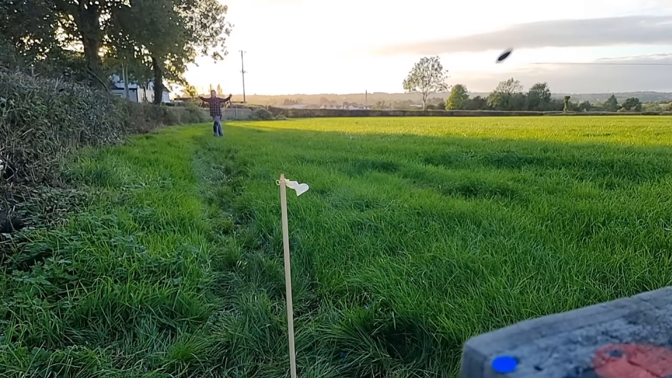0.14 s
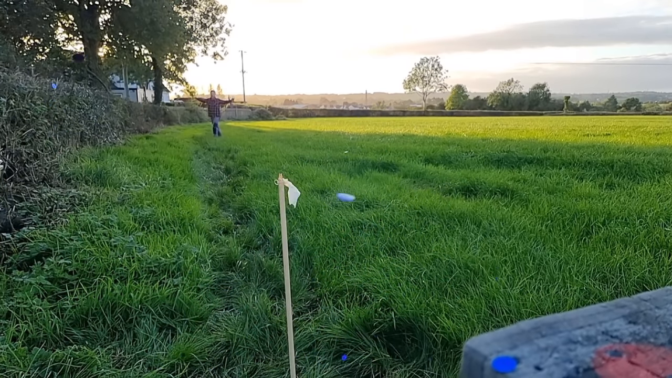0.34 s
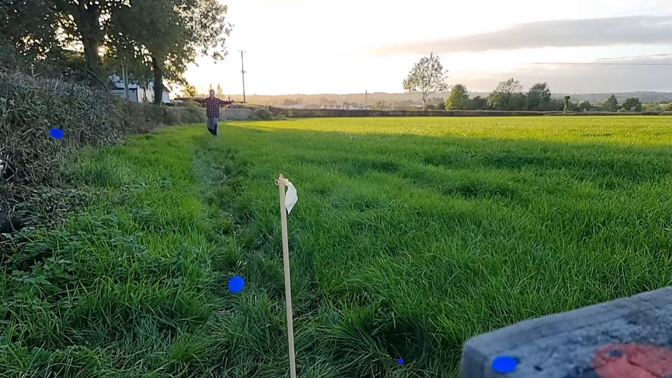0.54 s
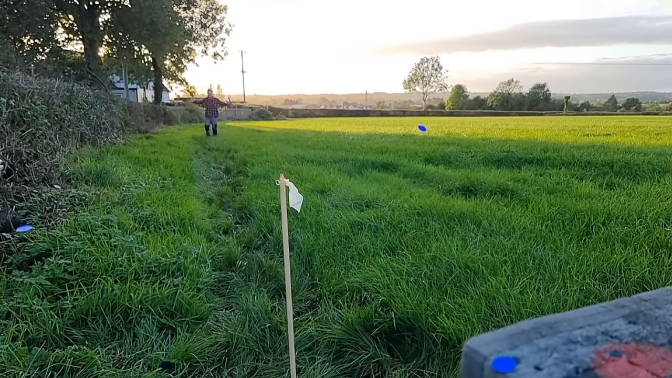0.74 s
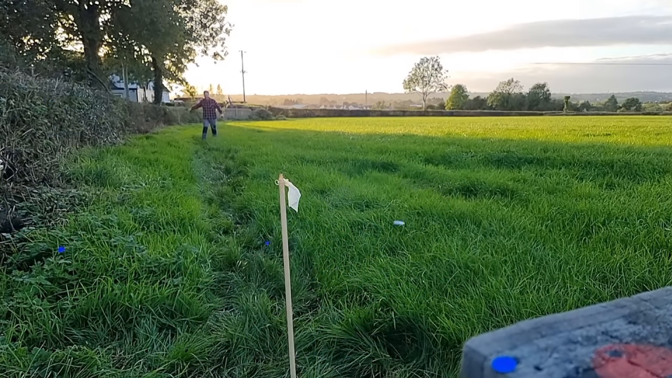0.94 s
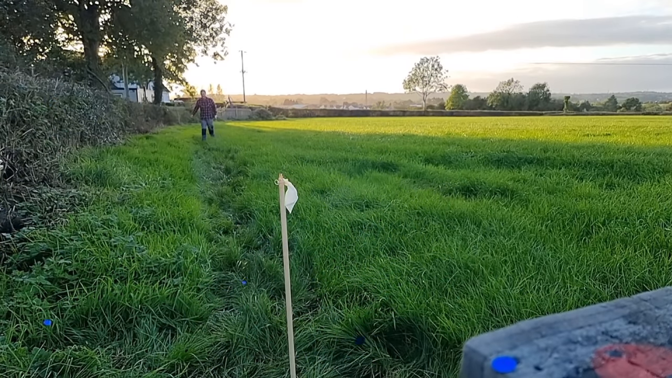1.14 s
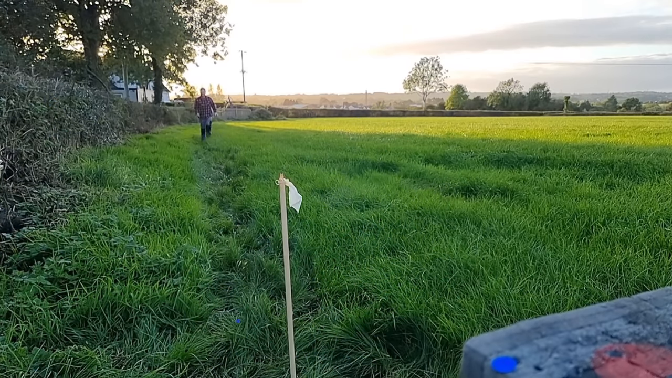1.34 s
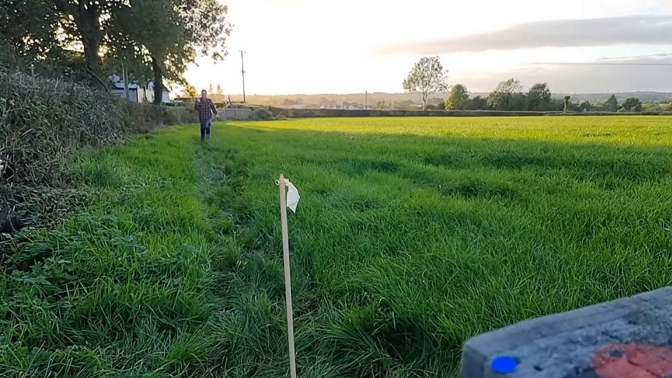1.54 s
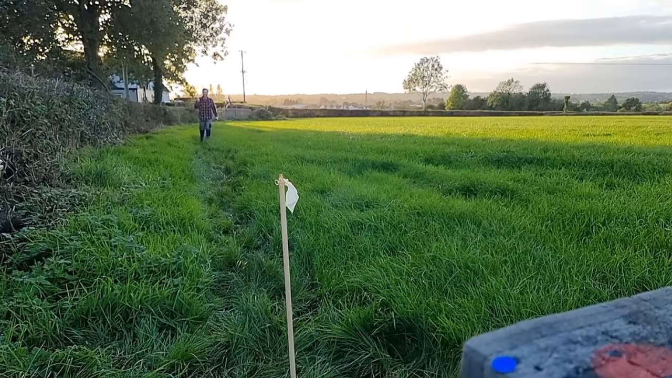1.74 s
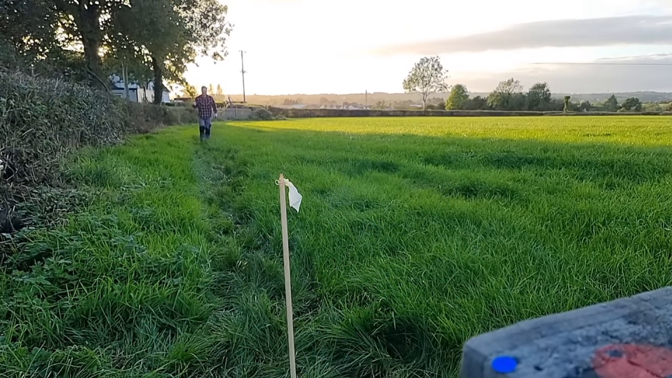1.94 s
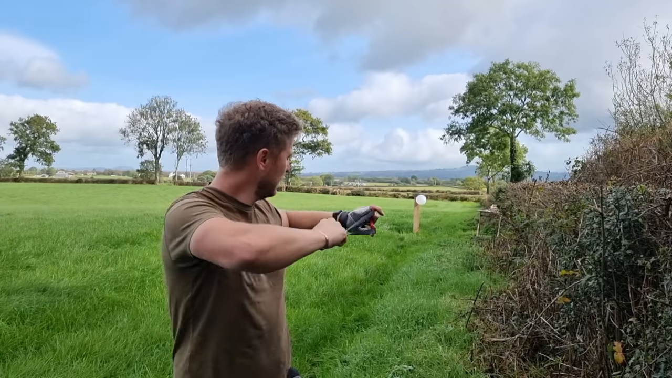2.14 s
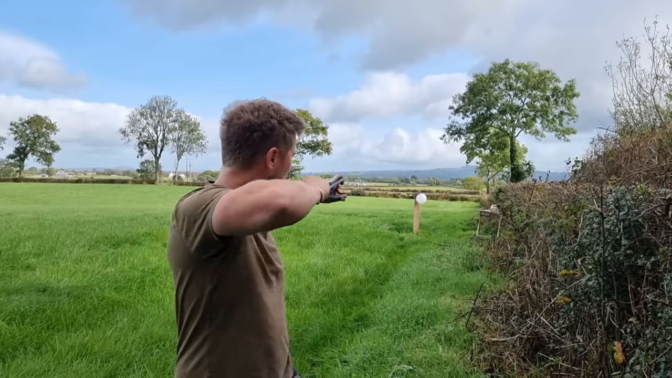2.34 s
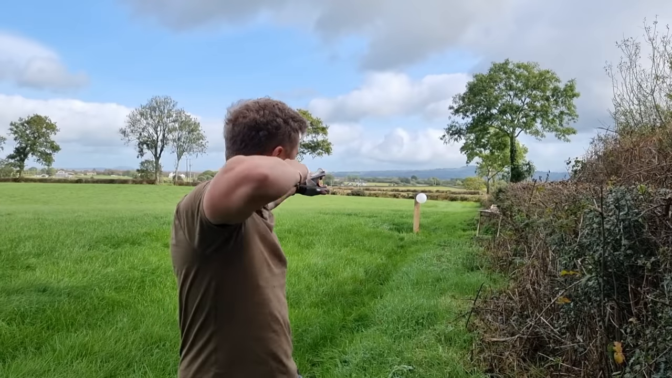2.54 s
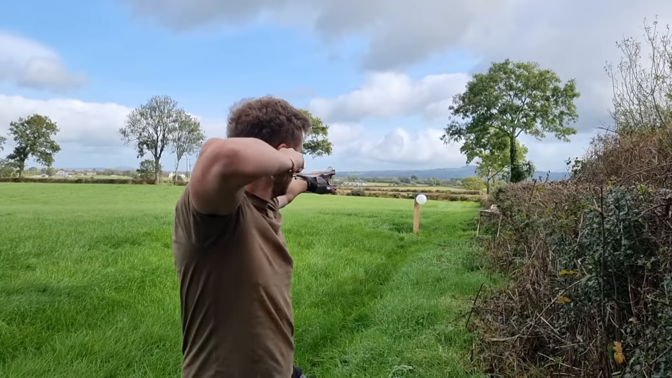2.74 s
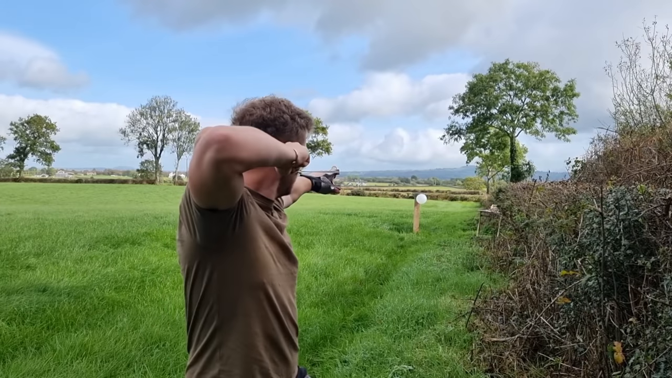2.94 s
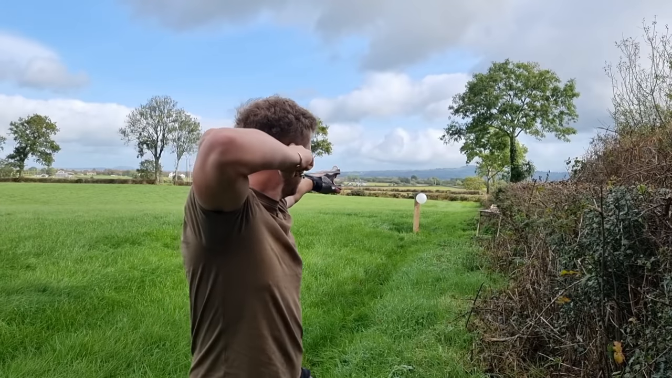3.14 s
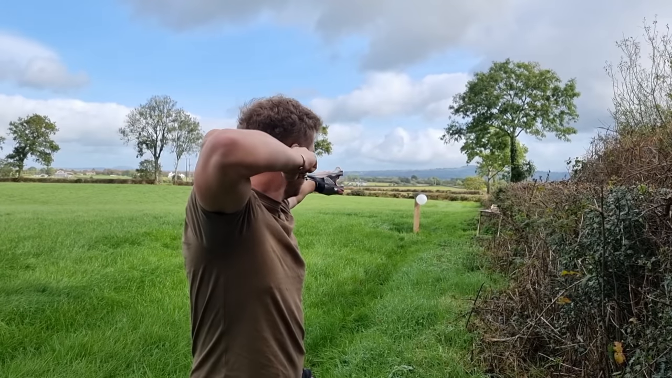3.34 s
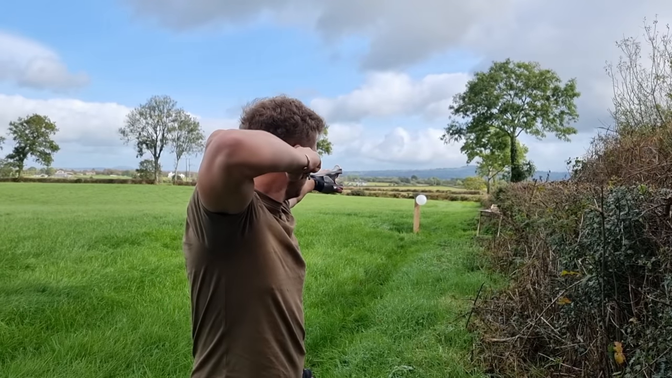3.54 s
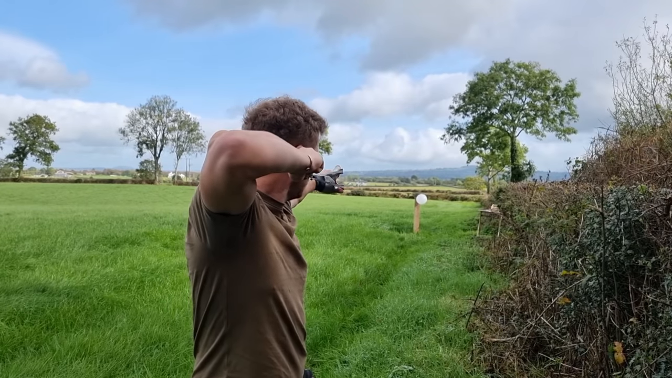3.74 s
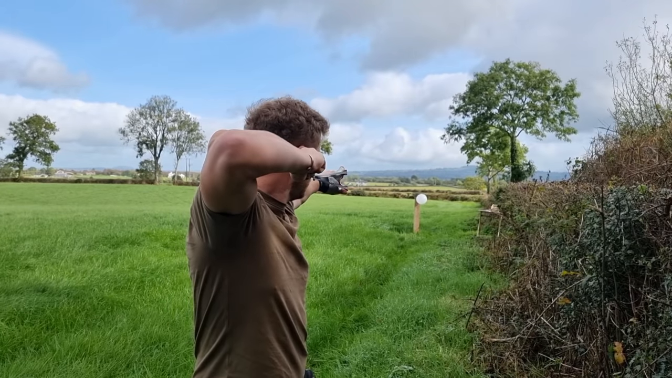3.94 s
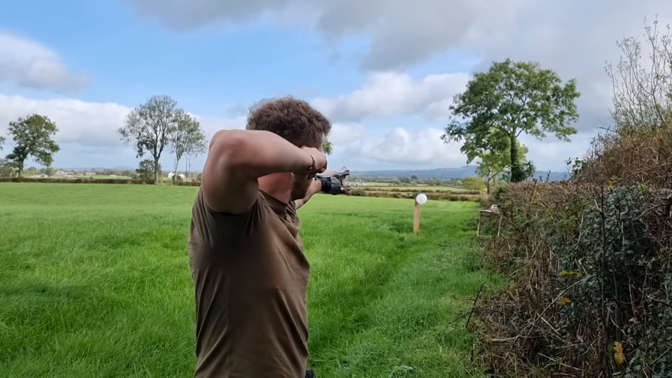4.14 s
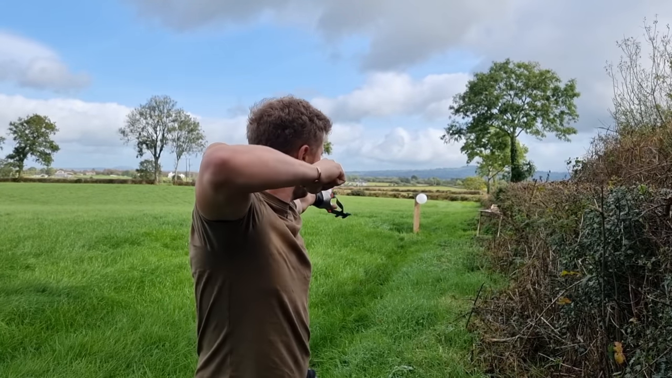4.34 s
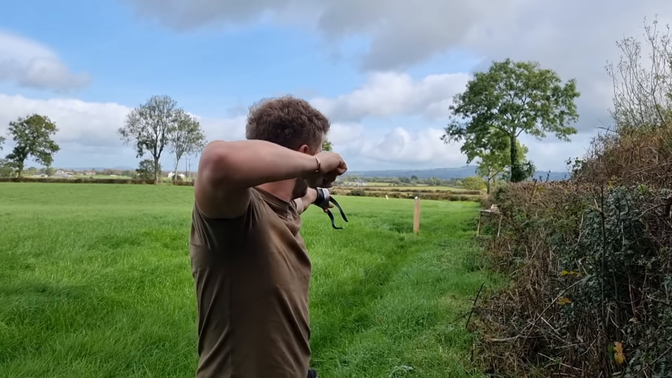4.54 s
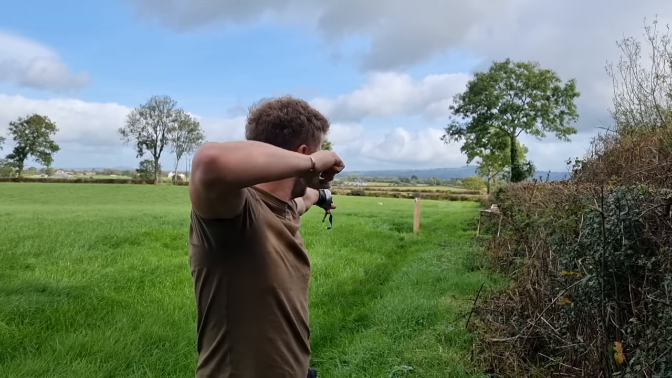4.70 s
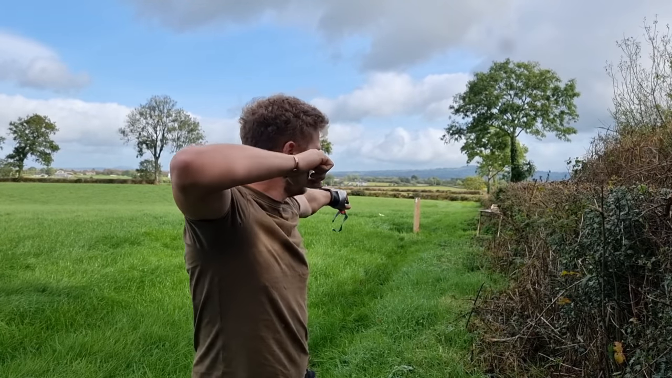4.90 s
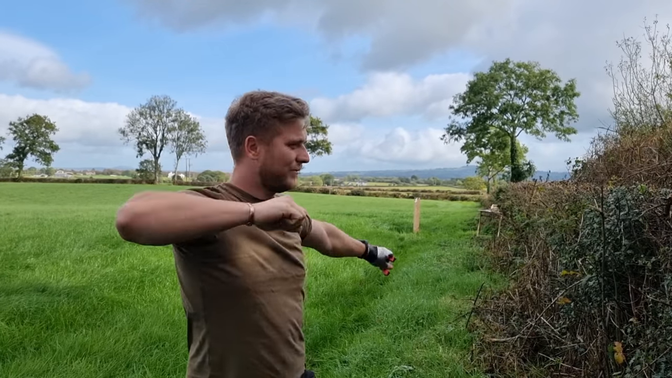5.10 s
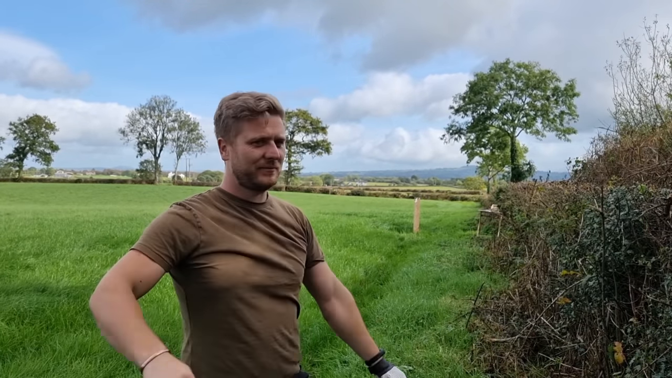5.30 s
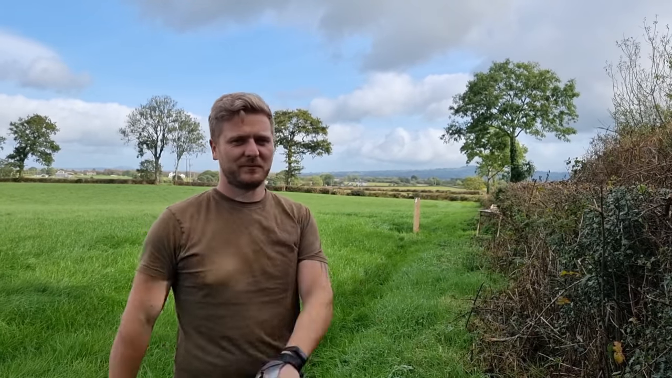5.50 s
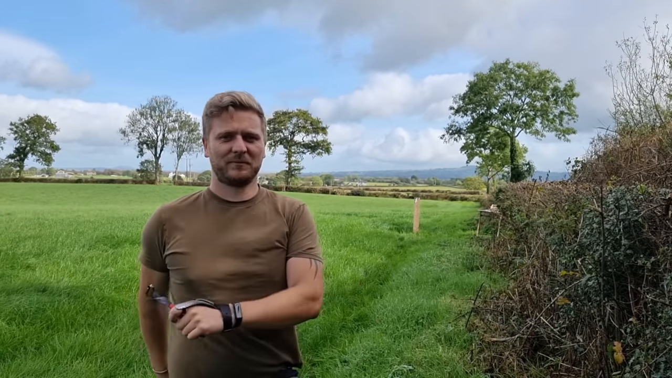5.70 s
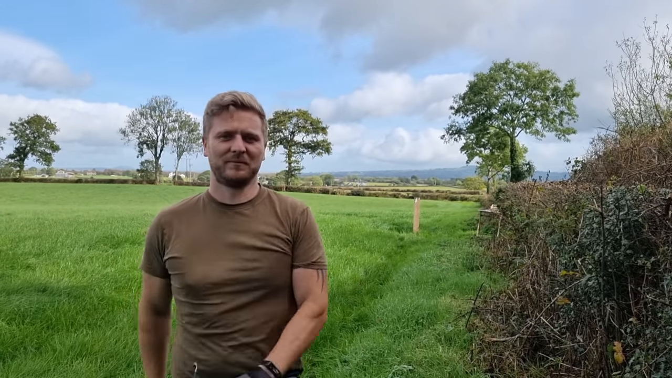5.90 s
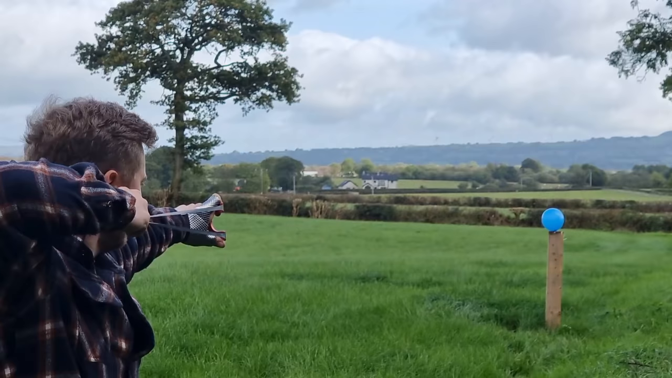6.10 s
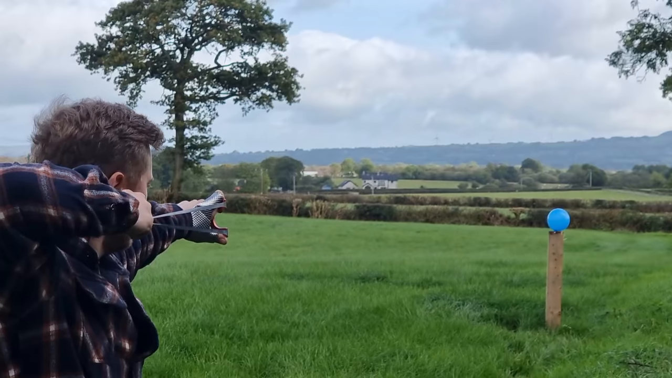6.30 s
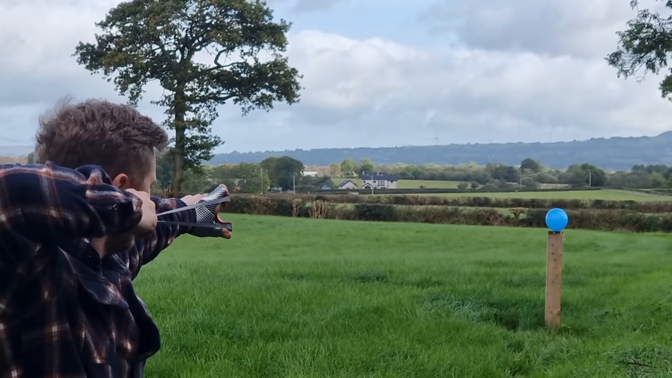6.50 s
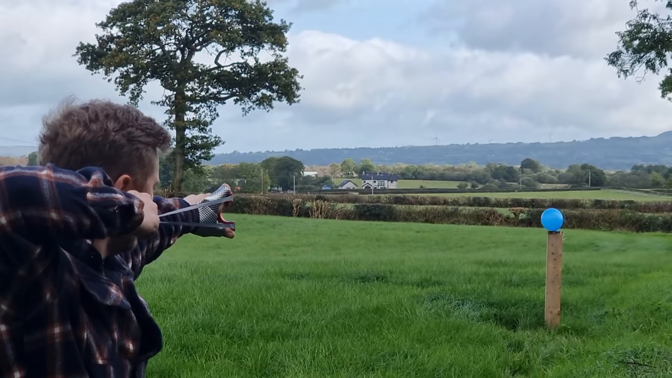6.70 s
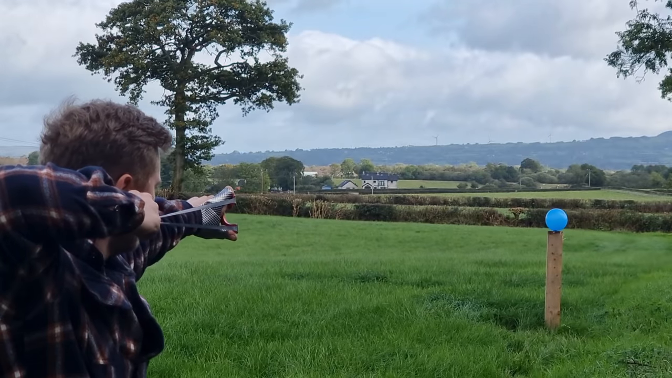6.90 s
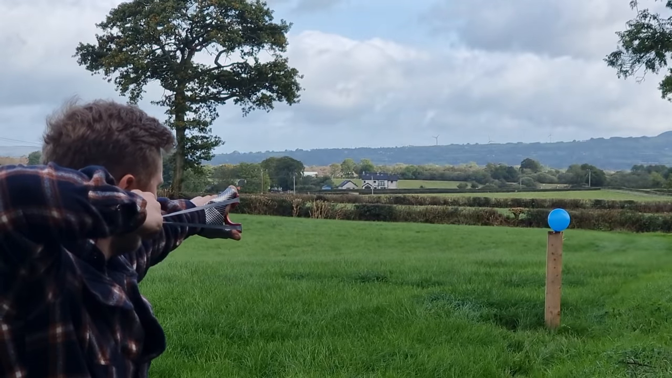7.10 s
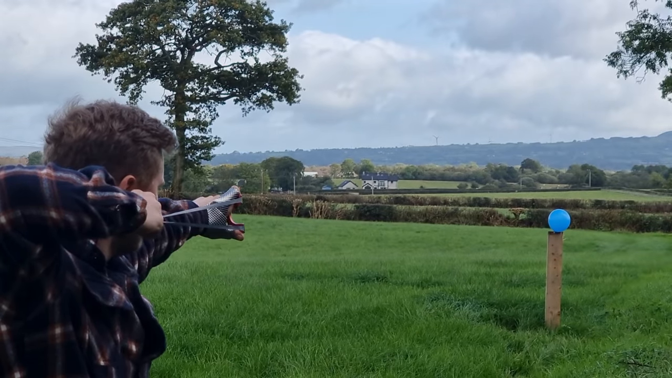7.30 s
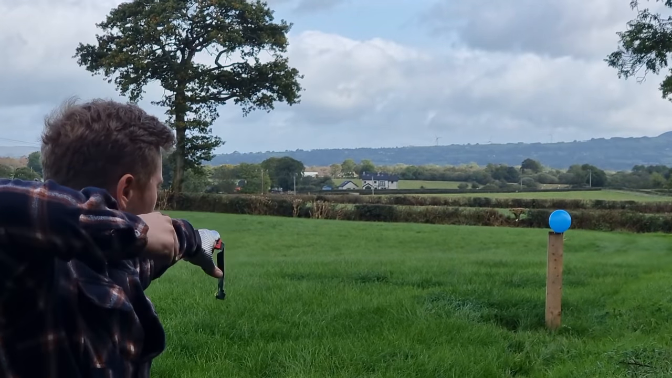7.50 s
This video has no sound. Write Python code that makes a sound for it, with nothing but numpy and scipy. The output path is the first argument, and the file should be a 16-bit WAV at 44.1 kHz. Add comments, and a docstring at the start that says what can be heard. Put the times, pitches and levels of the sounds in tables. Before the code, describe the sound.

An open field starts quiet, with a far country hum, light wind, faint rustling grass and distant bird calls. At about 2.4 seconds the background grows a little fuller, and a small bird close by gives a thin buzz and a quick run of high notes until 3.1. Low gusts rumble on the microphone on and off from about 3 seconds. At 4.4 a slingshot's rubber bands whip and slap with a soft thump. At 4.6 the dart bursts its target with a sharp crack, the loudest sound, echoing briefly off hedge and trees. Pieces rattle, and a few land softly until 5.2, followed by a dull bump. Faint traffic passes far off between about 4 and 6 seconds. Around 6.7 to 7.1 a bird gives three faint double ticks amid more gusts. At 7.5 the slingshot snaps again, slightly louder and brighter.

```python
"""Slingshot practice in an open field, with the stereo microphone set down at three spots in turn.
On each of two shots the rubber bands whip forward and slap twice over; the first dart bursts its
target with a loud crack that scatters off the hedge. Wind rumbles on the microphone and grass rustles.
Small birds sing close by and across the field, over a far country hum and passing traffic."""
import sys
import numpy as np
from scipy import signal
from scipy.fft import rfft, irfft, next_fast_len
from scipy.io import wavfile

SR = 44100
rng = np.random.default_rng(int(sys.argv[2]) if len(sys.argv) > 2 else 0)


def store_wav(level_fs):
    """Save 16-bit WAV to argv[1]."""
    pcm = np.round(np.clip(np.atleast_2d(level_fs), -1, 1) * 32767)
    wavfile.write(sys.argv[1], SR, pcm.T.astype(np.int16))


N = 332938
TIME = np.arange(N) / SR


def from_db(db):
    return 10 ** (np.asarray(db) / 20)


def at_hz(points, hz):
    """Reads a table on a log-frequency axis."""
    knots, values = np.transpose(points)
    return np.interp(np.log(np.maximum(hz, 1)), np.log(knots), values)


def panned(x, pan_db):
    """Places a sound left (positive) or right (negative) of the microphone."""
    return x * from_db([[pan_db / 2], [-pan_db / 2]])


def add(out, start_s, sound):
    """Mixes a sound in at a time."""
    start = max(round(start_s * SR), 0)
    out[:, start:start + sound.shape[-1]] += sound[..., :N - start]


def drift(rate_hz, size=N):
    """A smooth random wander with a spread of about 1."""
    steps = np.arange(size) * rate_hz / SR
    return np.interp(steps, np.arange(4096), rng.standard_normal(4096))


def swell(peak_s, level_db, rise_s, fall_s):
    """A gain that grows to a peak and dies away."""
    return from_db(level_db) * np.exp(-np.maximum((peak_s - TIME) / rise_s, (TIME - peak_s) / fall_s))


def noise(spectrum, likeness, tilt_db=0, size=N):
    """Stereo noise with a mid of rms 1; left-right likeness is a number or rows of freq_hz, likeness."""
    padded = next_fast_len(size, real=True)
    hz = np.fft.rfftfreq(padded, 1 / SR)
    alike = np.clip(at_hz(likeness, hz) if np.ndim(likeness) else likeness, -.7, 1)
    gain = from_db(at_hz(spectrum, hz) + tilt_db * np.log2(1 + hz / 1000))
    mid, side = gain * np.exp(2j * np.pi * rng.random((2, len(hz))))
    width = np.sqrt((1 - alike) / (1 + alike))
    pair = irfft(mid + width * side * [[1], [-1]], padded)[:, :size]
    return pair / np.std(pair.mean(axis=0))


def bursts(rows, spectrum, likeness, size=4096):
    """Short puffs of air that swell to a peak and die away."""
    out, t = np.zeros((2, N)), (np.arange(size) - size // 4) / SR
    for peak_s, level_db, rise_s, decay_s, tilt_db in rows:
        shape = np.exp(np.where(t < 0, t / rise_s, -t / decay_s))
        add(out, peak_s + t[0], from_db(level_db) * shape * noise(spectrum, likeness, tilt_db, size))
    return out


def scatter(x, t60s, likeness, tilt_db=0, size=32768):
    """Countless weak echoes off vegetation; each half octave dies as t60s (freq_hz, t60_s) says."""
    t, hz = np.arange(size) / SR, np.fft.rfftfreq(size, 1 / SR)
    spectrum = rfft(noise([(1, 0), (SR, 0)], likeness, tilt_db, size))
    edges_hz = 60 * 2 ** (np.arange(18) / 2)
    echoes = np.zeros((2, size))
    for low, high in zip(edges_hz, edges_hz[1:]):
        band = irfft(spectrum * ((hz >= low) & (hz < high)))
        echoes += band * 1000 ** (-t / at_hz(t60s, np.sqrt(low * high)))
    return signal.oaconvolve(x, echoes / np.sqrt(np.sum(echoes ** 2) / 2), axes=1)[:, :N]


def present(start_s, end_s, fade_s=.05):
    """A gain that fades in and out with the microphone's stay at one spot."""
    return np.clip(np.minimum(TIME - start_s, end_s - TIME) / fade_s, 0, 1)


# the microphone's stay at each spot: start_s, end_s
MIC_SPOTS = [(0, 2.39), (2.37, 6.27), (6.22, 7.65)]

def at_spots(levels_db, fade_in_db=9, fade_in_s=.8):
    """A background gain that comes up at the start and is then steady at each spot."""
    steady = sum(from_db(level_db) * present(*spot) for spot, level_db in zip(MIC_SPOTS, levels_db))
    return steady * from_db(-fade_in_db * np.exp(-TIME / fade_in_s))


# the distant hum, one spectrum per spot: freq_hz, density_db
HUM_SPECTRA = [
    [(88, -29), (150, 1.5), (223, -2), (246, -8.5), (410, -14), (545, -8), (588, -7.5), (910, -6),
     (1740, -19), (2310, -32), (2540, -34), (14000, -38)],
    [(80, -21), (150, 1.5), (330, 5), (450, -3.5), (750, -1.5), (1000, -3), (1500, -12), (2300, -24),
     (4000, -28.5), (6800, -29.5), (8000, -49.5), (15000, -43)],
    [(88, -28), (150, -7), (193, -10), (229, -6.5), (525, -4.5), (567, -4.5), (1380, -14.5), (1570, -21.5),
     (1870, -21.5), (2970, -31), (4720, -37.5), (6550, -35), (7940, -57), (15000, -43.5)],
]
# its strength at each spot: level_db
HUM_LEVELS = [-63, -60.6, -59.5]
# how alike it reaches the two sides of the microphone: freq_hz, likeness
HUM_STEREO = [(150, .6), (380, .5), (700, -.35), (1100, -.05), (2400, -0.09), (15000, 0.12)]

def country_hum(fade_s=.01):
    """Far traffic and trees, coloured differently at each spot."""
    hum = np.zeros((2, N))
    for (start_s, end_s), spectrum in zip(MIC_SPOTS, HUM_SPECTRA):
        size = int((end_s - start_s) * SR)
        soft_ends = signal.windows.tukey(size, 2 * fade_s / (end_s - start_s))
        add(hum, start_s, noise(spectrum, HUM_STEREO, size=size) * soft_ends)
    return at_spots(HUM_LEVELS) * hum


# light air on the microphone at each spot: level_db
BREEZE_LEVELS = [-61.5, -52, -52]
# gusts on the microphone: peak_s, level_db
MIC_GUSTS = [(1.45, -62.5), (2.95, -43.5), (3.379, -41.5), (3.85, -47), (4.75, -46.5), (5.44, -43),
             (6.62, -44), (6.9, -39.5)]
# eddies at its ports: freq_hz, density_db
EDDY_SPECTRUM = [(11, -40), (18, -16.5), (46, -1), (68, -1), (83, -3), (233, -29), (260, -27), (340, -55.5),
                 (570, -120)]

def wind(gain_db=1, lumpy_db=2.8, buffet_db=-52):
    """Light air moves both microphone ports alike; gusts buffet each on its own."""
    gust_power = sum(swell(s, level_db, rise_s=.17, fall_s=.27) ** 2 for s, level_db in MIC_GUSTS)
    strength = np.sqrt(at_spots(BREEZE_LEVELS) ** 2 + gust_power)
    eddies = noise(EDDY_SPECTRUM, likeness=[(50, .05), (200, .4)])
    shared = eddies.mean(axis=0)
    apart = np.minimum(strength / from_db(buffet_db), 1)
    rumble = shared + apart * (eddies - shared)
    return panned(rumble * strength * from_db(gain_db + lumpy_db * drift(13)), pan_db=2)


def whistle(hz, level_db, octave_db=-40, attack_s=.016, release_s=.016):
    """A bird's near-pure tone with soft ends and a faint octave."""
    t, phase = np.arange(len(hz)) / SR, 2 * np.pi * np.cumsum(hz) / SR
    shape = np.minimum(t / attack_s, 1) * np.minimum((t[-1] - t) / release_s, 1)
    tone = np.sin(phase) + from_db(octave_db) * np.sin(2 * phase)
    return from_db(level_db) * np.sqrt(2) * shape * tone


def warbled(hz, level_db, depth_hz, octave_db=-40, warble_hz=150, flutter_db=4):
    """A whistle that trembles in pitch and level."""
    size = len(hz)
    phase = 2 * np.pi * warble_hz * np.arange(size) / SR + drift(60, size)
    warble = np.sin(phase) + .5 * drift(200, size)
    return whistle(hz + depth_hz * warble, level_db + flutter_db * drift(90, size), octave_db)


# calls from across the field, with one nearer note at 1.662 s: start_s, length_s, first_hz, last_hz, level_db
FIELD_CALLS = [(.64, .18, 2310, 2370, -86), (1.067, .14, 1566, 1663, -71), (1.36, .09, 1480, 1560, -71),
               (1.39, 0.18, 1960, 1700, -72), (1.515, .12, 2176, 2090, -74.5),
               (1.662, .046, 2240, 1870, -67.5), (1.81, 0.062, 2200, 2580, -74),
               (1.995, .15, 1940, 1825, -73), (6.4, 0.029, 2946, 2870, -70),
               (6.736, .048, 2550, 1880, -67.5), (6.747, 0.032, 3400, 2800, -73)]

def far_birds(direct_db=-5, echo_db=-2, rasp_hz_per_s=1100):
    """Faint glides from far off, the longer the hoarser, reaching the microphone largely as echo."""
    calls = np.zeros((2, N))
    for start_s, length_s, first_hz, last_hz, level_db in FIELD_CALLS:
        size = int(length_s * SR)
        call = warbled(np.geomspace(first_hz, last_hz, size), level_db, rasp_hz_per_s * length_s)
        add(calls, start_s, call * signal.windows.tukey(size, .6))
    echoes = scatter(calls, [(2000, .24), (4500, .31)], likeness=.065)
    return from_db(direct_db) * calls + from_db(echo_db) * echoes


# flurries in the grass around the microphone: peak_s, level_db, spread_s
GRASS_FLURRIES = [(1.1, -79, 0.22), (1.487, -71.5, .005), (1.63, -71, .075), (1.8, -75, .025),
                  (2.32, -71, .025), (6.15, -72, .12)]
# their rustle: freq_hz, density_db
GRASS_SPECTRUM = [(1500, -8), (2500, 3), (4500, -3), (6700, 6.5), (8500, -7), (13500, -2), (16000, -4.5)]

def grass(crisp_db=2):
    """Wind rustles the grass in faint, flickering flurries."""
    flurries = sum(swell(s, level_db, spread_s, spread_s) for s, level_db, spread_s in GRASS_FLURRIES)
    return noise(GRASS_SPECTRUM, likeness=.15) * flurries * from_db(crisp_db * drift(73))


# song from the near hedge: start_s, length_s, first_hz, held_hz, last_hz, level_db, pan_db, depth_hz
HEDGE_SONG = [(2.607, .076, 5800, 4420, 4260, -39, -7, 100), (2.695, .058, 5760, 4660, 4590, -37.5, -1, 42),
              (2.828, .072, 5290, 4600, 4870, -44.5, -7, 30),
              (2.848, 0.039, 5600, 5550, 5440, -53.5, 5, 55),
              (2.897, .122, 5400, 2678, 3220, -48.5, -4, 22), (2.982, .056, 3400, 3370, 3670, -56, 5, 90),
              (3.013, 0.054, 3630, 4060, 3960, -51, 0, 20)]
BUZZ_START_S, BUZZ_LENGTH_S, BUZZ_HZ, BUZZ_DB = 2.378, .174, 7660, -48.3

def near_bird(scoop_hz_per_s=210000, port_lag_s=.00017, echo_db=-9):
    """A thin buzz, then notes that scoop onto their pitch and bend away; wider scoops take longer."""
    song, size = np.zeros((2, N)), int(BUZZ_LENGTH_S * SR)
    buzz = warbled(BUZZ_HZ + 200 * drift(980, size), BUZZ_DB, depth_hz=300, octave_db=-11)
    add(song, BUZZ_START_S, panned(buzz * signal.windows.tukey(size, .3), pan_db=5))
    for start_s, length_s, first_hz, held_hz, last_hz, level_db, pan_db, depth_hz in HEDGE_SONG:
        t = np.arange(int(length_s * SR)) / SR
        scoop = (first_hz - held_hz) * np.exp(-t * scoop_hz_per_s / (abs(first_hz - held_hz) + 1))
        bend = (last_hz - held_hz) * (t / length_s) ** 2
        note = warbled(held_hz + scoop + bend, level_db, depth_hz, octave_db=-42, warble_hz=120)
        add(song, start_s, panned(note, pan_db))
    song[0] = np.interp(TIME - port_lag_s, TIME, song[0])  # the singer sits to the right
    echoes = scatter(song, [(2000, .28), (4500, .34), (8000, .23)], likeness=.065)
    return song + from_db(echo_db) * echoes


# vehicles on a far road: loudest_s, spread_s, roar_db, engine tones as (pitch_hz, level_db)
VEHICLES = [(4.2, .5, -66, [(262, -70), (285, -69), (334, -69), (361, -70)]), (5.8, .38, -64, [(172, -69),
            (205, -68), (1163, -78)])]
# tyre roar from across the fields: freq_hz, density_db
TYRE_SPECTRUM = [(300, -22), (550, -3), (850, 0), (1150, -6), (1600, -22), (2600, -42), (5000, -70)]

def traffic(waver_hz=1.3, throb_db=2, engine_db=1.5, drone_spread=1.7):
    """Each vehicle swells and fades in the distance; its engine is heard for longer than its tyres."""
    out, roar = np.zeros((2, N)), noise(TYRE_SPECTRUM, likeness=-.3)
    for loudest_s, spread_s, roar_db, tones in VEHICLES:
        out += roar * from_db(roar_db) * np.exp(-.5 * ((TIME - loudest_s) / spread_s) ** 2)
        nearness = np.exp(-.5 * ((TIME - loudest_s) / (drone_spread * spread_s)) ** 2)
        for pitch_hz, level_db in tones:
            tone = np.sqrt(2) * np.sin(2 * np.pi * np.cumsum(pitch_hz + waver_hz * drift(11)) / SR)
            out += tone * nearness * from_db(engine_db + level_db + throb_db * drift(6))
    return out * present(*MIC_SPOTS[1])  # the road carries only to the second spot


# the bands hit the fork: slap_s, level_db, rebound_s, release_tilt_db (per octave)
BAND_SHOTS = [(4.3600, -24, .0107, 3), (7.5176, -20, .0117, 11)]
# the snap of flat rubber: freq_hz, density_db
RUBBER_SPECTRUM = [(80, 10.5), (250, 3.5), (700, 6), (1300, 5.5), (2400, 3.5), (3500, 2), (5000, -0.5),
                   (7200, -3.5), (8400, -10.5), (11000, -9.5), (15200, -8.5), (16500, -20)]
# the stages of every shot: relative_db, rise_s, decay_s, tilt_db (per octave)
BAND_WHIP = (-4, .0034, .003, 2)
BAND_SLAP = (-.5, .0005, .0012, 2)
BAND_RECOIL = (-7.5, .002, .003, .5)
BAND_SLAP_BACK = (2, .0009, .0011, 3)
BAND_FLUTTER = (-9, .0015, .006, 5)
RELEASE_DB, RELEASE_RISE_S, RELEASE_DECAY_S = -11.5, .0018, .005

def slingshot(flight_s=.0232, whip_lead_s=.0046, flutter_lag_s=.005, ground_db=-6.5):
    """Let go, the rubber whips, slaps the fork, recoils, slaps back and flutters; the ground echoes."""
    puffs = []
    for slap_s, level_db, rebound_s, release_tilt_db in BAND_SHOTS:
        release = (RELEASE_DB, RELEASE_RISE_S, RELEASE_DECAY_S, release_tilt_db)
        stages = [(-flight_s, release), (-whip_lead_s, BAND_WHIP), (0, BAND_SLAP),
                  (rebound_s / 2, BAND_RECOIL), (rebound_s, BAND_SLAP_BACK),
                  (rebound_s + flutter_lag_s, BAND_FLUTTER)]
        for delay_s, (relative_db, *shape) in stages:
            puffs.append((slap_s + delay_s, level_db + relative_db, *shape))
    slaps = bursts(puffs, RUBBER_SPECTRUM, likeness=[(300, 1), (3000, .7), (12000, .072)])
    ground = scatter(slaps, [(300, .046), (3000, .13), (12000, .16)], likeness=.33)
    return slaps + from_db(ground_db) * ground


# soft thumps of air and movement: peak_s, level_db
AIR_THUMPS = [(4.386, -37), (5.2295, -42)]
# their dull colour: freq_hz, density_db
THUMP_SPECTRUM = [(30, -10), (80, 0), (200, -2), (450, -22), (1200, -60)]

def thumps(rise_s=.003, decay_s=.006, top_hz=500):
    """Dull bumps as the bands go slack and as the shooter turns round."""
    puffs = [(peak_s, level_db, rise_s, decay_s, 0) for peak_s, level_db in AIR_THUMPS]
    bumps = bursts(puffs, THUMP_SPECTRUM, likeness=.85)
    return signal.sosfilt(signal.butter(2, top_hz, fs=SR, output="sos"), bumps)


# the dart pierces, then the target bursts: peak_s, level_db, rise_s, decay_s, tilt_db (per octave)
DART_BLOWS = [(4.6033, -14.5, 0.0003, 0.001, -3.5), (4.6049, -8.7, 0.00032, 0.0018, -1.2)]
# the crack: freq_hz, density_db
CRACK_SPECTRUM = [(100, -11), (450, -15.5), (1200, 0), (1900, 2.5), (2700, -1), (3600, -2), (5000, -12),
                  (7000, -9), (8300, -19), (14000, -15.5), (16000, -18.5)]
# the target's hollow ring: pitch_hz, level_db, t60_s, pan_db
TARGET_MODES = [(134.4, -19, 0.031, 2.5), (260.3, -10.5, 0.014, 4.5), (732, -12.5, .016, -2),
                (1860, -6, 0.0082, -1), (1964, -12.5, .018, -3), (2350, -14, 0.0087, -1),
                (2650, -12.5, 0.013, 0.5), (3730, -16.5, 0.016, 0.5)]
# the field's long echo off grass, hedge and trees: freq_hz, t60_s
FIELD_DECAY = [(100, .15), (450, 0.12), (800, 0.37), (2000, 0.55), (4000, 0.5), (7000, 0.39), (9000, 0.36),
               (16000, 0.2)]

def target(port_lag_s=.00007, hedge_db=-9.5, trees_db=-19, lowest_hz=70):
    """The dart bursts the target: a crack and a brief ring, thrown back by near hedge and far trees."""
    hit = bursts(DART_BLOWS, CRACK_SPECTRUM, likeness=[(300, .86), (2500, .9), (5000, .1), (9000, .189)])
    burst_s, t = DART_BLOWS[1][0], np.arange(SR // 4) / SR
    for pitch_hz, level_db, t60_s, pan_db in TARGET_MODES:
        ring = 1000 ** (-t / t60_s) * np.sin(2 * np.pi * pitch_hz * t)
        add(hit, burst_s, panned(from_db(level_db) * ring, pan_db))
    # the hit carries no deep bass
    hit = signal.sosfilt(signal.butter(2, lowest_hz, "high", fs=SR, output="sos"), hit)
    hit[0] = np.interp(TIME - port_lag_s, TIME, hit[0])  # it lies a little right of the microphone
    hedge = scatter(hit, [(150, .1), (1500, .064), (6000, .22), (12000, .19)], likeness=.25, tilt_db=-1)
    trees = scatter(hit, FIELD_DECAY, likeness=.1, tilt_db=.5)
    return hit + from_db(hedge_db) * hedge + from_db(trees_db) * trees


# a last weak bounce of the target, then stray pieces come down: peak_s, level_db
LATE_KNOCKS = [(4.8015, -46), (5.088, -54), (5.178, -54)]
# their clatter: freq_hz, density_db
CLATTER_SPECTRUM = [(200, -12), (700, -0.5), (1400, -8.5), (2100, 3), (3200, -14), (6500, -20),
                    (9000, -36.5), (16000, -46)]
RATTLE_START_S, RATTLE_DB, BOUNCE_GAP_S, BOUNCE_SHRINK, BOUNCE_LOSS_DB = 4.6415, -27.5, .0478, .895, 3.1

def falling_pieces(count=4, rise_s=.0006, decay_s=.0028, tilt_db=-2.5, direct_db=-4, stems_db=-3):
    """The burst target rattles in ever quicker, weaker bounces, with one last weak bounce; stray pieces land
    later."""
    gaps_s = BOUNCE_GAP_S * BOUNCE_SHRINK ** np.arange(count - 1)
    times_s = RATTLE_START_S + np.cumsum([0, *gaps_s])
    bounces = [(s, RATTLE_DB - BOUNCE_LOSS_DB * k) for k, s in enumerate(times_s)]
    knocks = [(s, level_db, rise_s, decay_s, tilt_db) for s, level_db in bounces + LATE_KNOCKS]
    pieces = bursts(knocks, CLATTER_SPECTRUM, likeness=[(700, -.16), (2000, .5)])
    stems = scatter(pieces, [(500, .075), (4000, .16)], likeness=0)  # the stems go on shaking
    return from_db(direct_db) * pieces + from_db(stems_db) * stems


# double ticks heard at the third spot: main_s, main_db, lead_db
ALARM_TICKS = [(6.738, -59, -72), (6.930, -57, -63), (7.107, -60.5, -75)]
TICK_LEAD_S, TICK_TOP_HZ, TICK_BOTTOM_HZ = .023, 7700, 4200

def scolding_bird(tick_s=.0095, rasp_db=4, rasp_hz=330, echo_db=-7):
    """A small bird's alarm ticks come in pairs, weak then strong: rough, steep downward sweeps."""
    ticks, size = np.zeros((2, N)), int(tick_s * SR)
    for main_s, main_db, lead_db in ALARM_TICKS:
        for start_s, level_db in (main_s - TICK_LEAD_S, lead_db), (main_s, main_db):
            sweep_hz = np.geomspace(TICK_TOP_HZ, TICK_BOTTOM_HZ, size) + rasp_hz * drift(1220, size)
            rough_db = level_db + rasp_db * drift(1000, size)
            add(ticks, start_s, whistle(sweep_hz, rough_db, attack_s=.0029, release_s=.0027))
    return ticks + from_db(echo_db) * scatter(ticks, [(4000, .19), (7000, .24)], likeness=.1)


def scene():
    """Two shots in the open field, among birds, wind and far traffic."""
    shots = slingshot() + target() + falling_pieces()
    birds = near_bird() + far_birds() + scolding_bird()
    return shots + birds + country_hum() + wind() + grass() + traffic() + thumps()


def record(dry, cutoff_hz=15700):
    """The recorder caps peaks at full scale and cuts the highest treble."""
    lowpass = signal.ellip(10, .2, 80, cutoff_hz, fs=SR, output="sos")
    return signal.sosfilt(lowpass, np.clip(dry, -1, 1))


dry = scene()
out = record(dry)
store_wav(out)
```